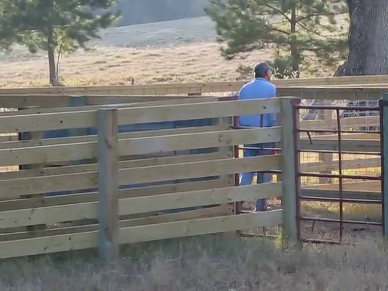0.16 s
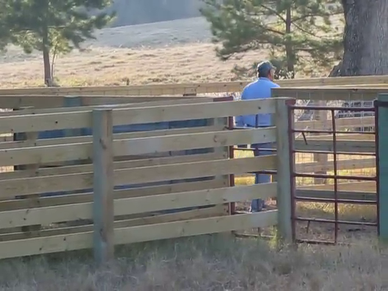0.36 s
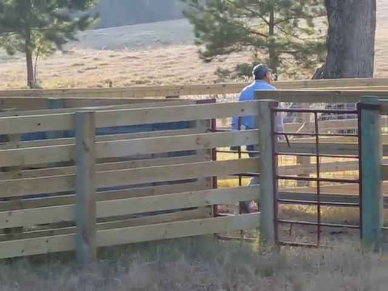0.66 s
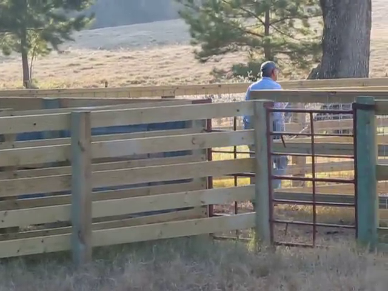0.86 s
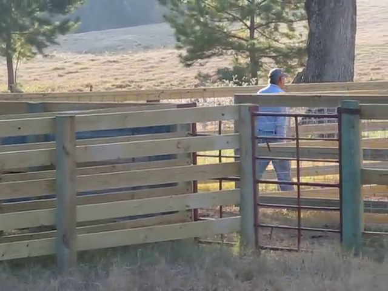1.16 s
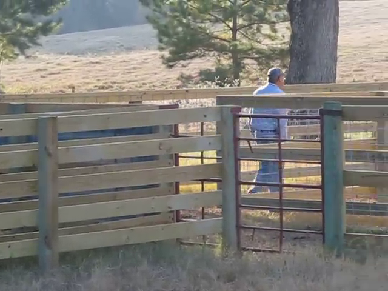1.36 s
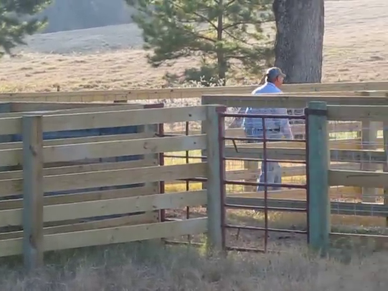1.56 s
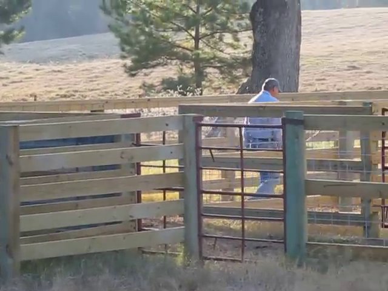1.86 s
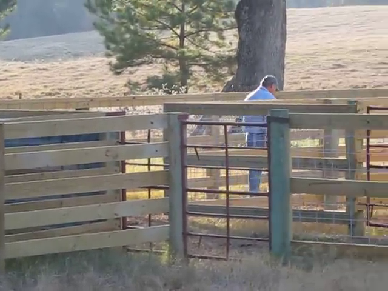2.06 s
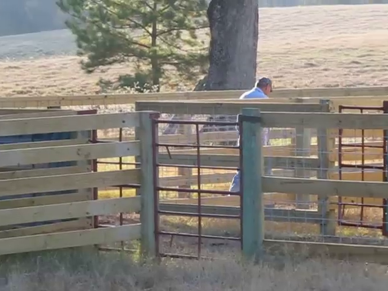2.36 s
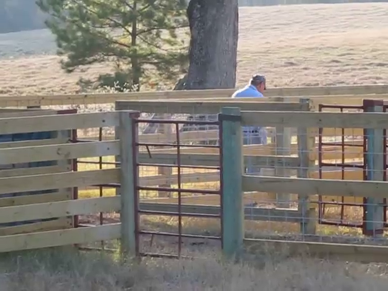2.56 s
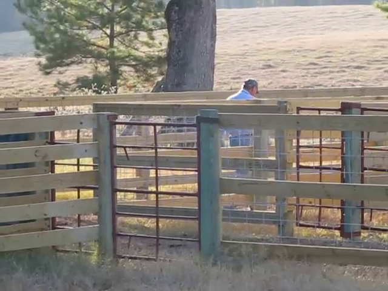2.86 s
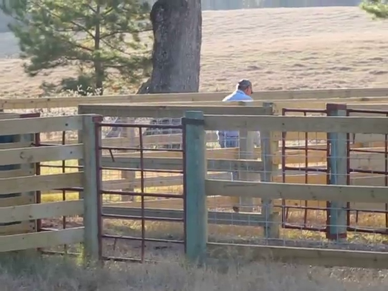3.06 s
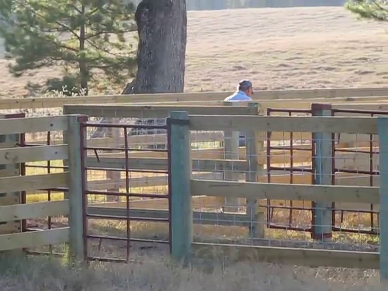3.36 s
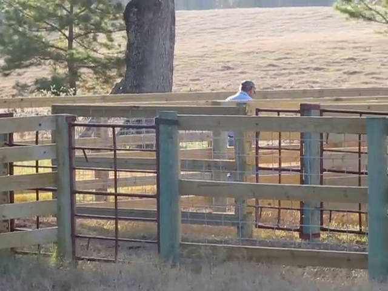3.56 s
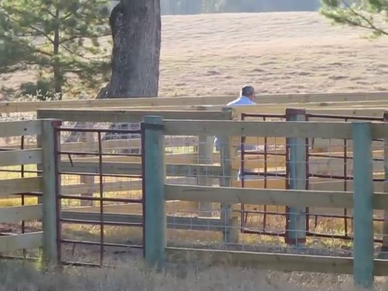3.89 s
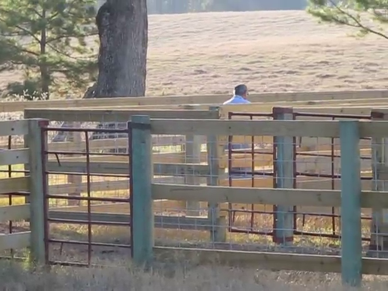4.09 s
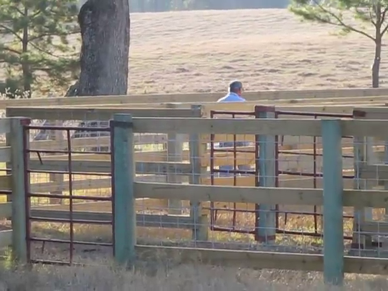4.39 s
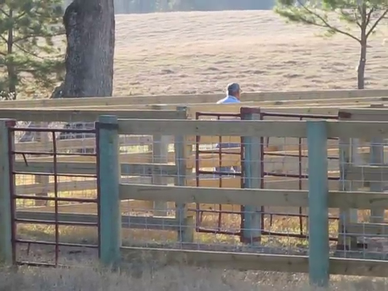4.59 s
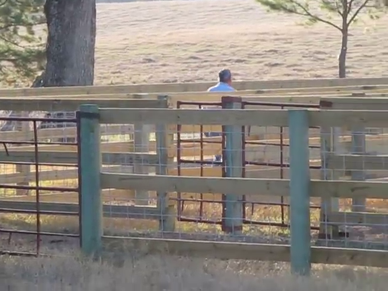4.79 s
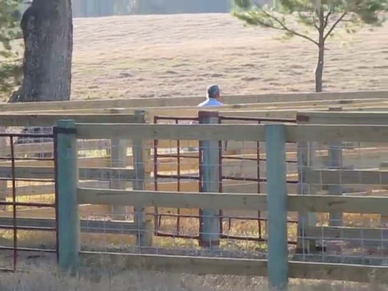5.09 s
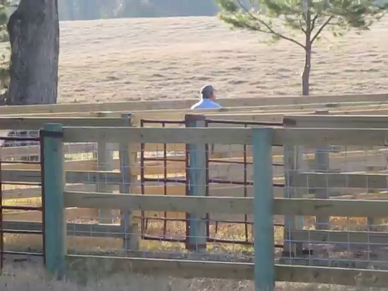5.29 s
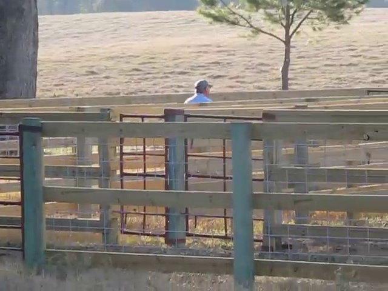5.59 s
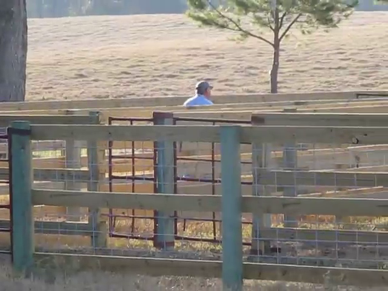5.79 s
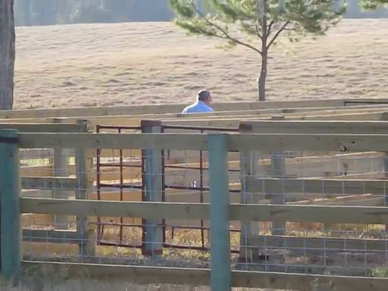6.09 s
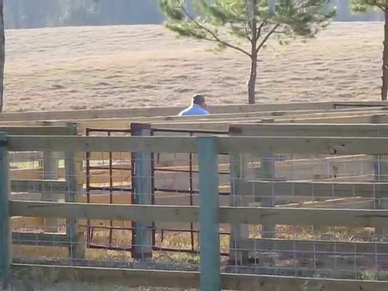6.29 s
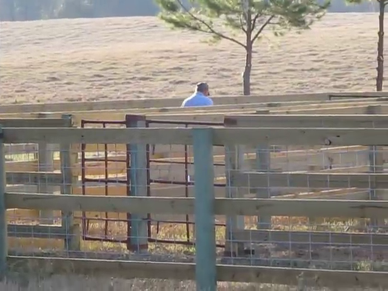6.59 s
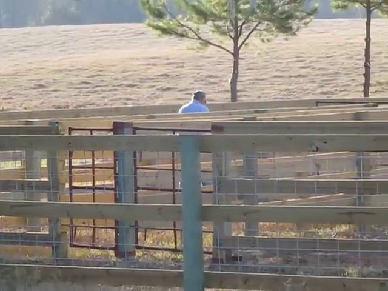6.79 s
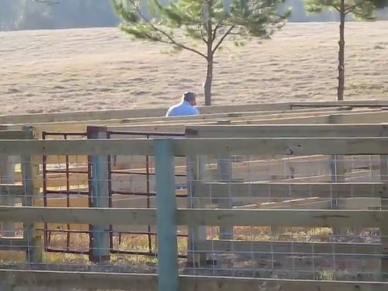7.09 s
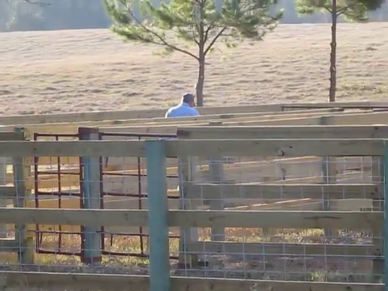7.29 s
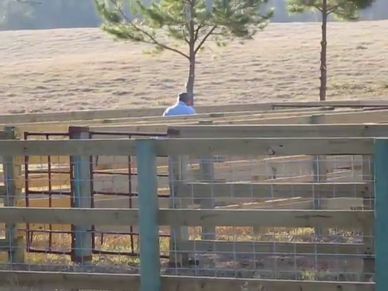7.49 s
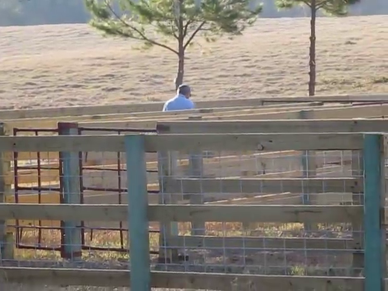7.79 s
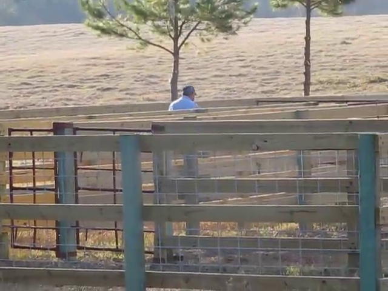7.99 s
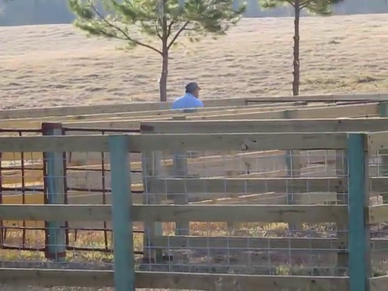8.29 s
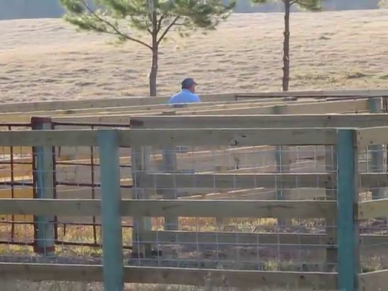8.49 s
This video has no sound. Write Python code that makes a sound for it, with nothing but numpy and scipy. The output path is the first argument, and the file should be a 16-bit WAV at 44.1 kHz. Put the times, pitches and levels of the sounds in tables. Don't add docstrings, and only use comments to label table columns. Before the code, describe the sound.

A single rising moo rings over an open field among faint birds and cricket trills, with camera lens ticks and late wind buffeting.

```python
import sys
import numpy as np
from scipy import signal
from scipy.io import wavfile
from scipy.ndimage import uniform_filter1d

SR = 44100
rng = np.random.default_rng(int(sys.argv[2]) if len(sys.argv) > 2 else 0)


def linear_from_db(decibels):
    return 10 ** (np.asarray(decibels, float) / 20)


def output_pcm(signal):
    pcm = np.clip(np.atleast_2d(signal).T, -1, 1) * 32767
    wavfile.write(sys.argv[1], SR, np.round(pcm).astype(np.int16))


N = 381448
T = np.arange(N) / SR


def rms_one(x):
    return x / np.sqrt(np.mean(x ** 2) + 1e-20)


def in_time(rows):
    s, *columns = np.transpose(rows)
    return [np.interp(T, s, c) for c in columns]


def window(rows, fade_s):
    return np.clip(np.minimum(T - rows[0][0], rows[-1][0] - T) / fade_s, 0, 1)


def at_hz(points, hz):
    table_hz, value = np.transpose(points)
    return np.interp(np.log(hz), np.log(table_hz), value)


def drift(rate_hz):
    r = np.exp(-40 * np.pi * rate_hz / SR)
    white = rng.standard_normal(N // 20 + 3002)
    slow = signal.lfilter([1], [1, -2 * r, r * r], white)[3000:]
    return np.interp(np.arange(N) / 20, np.arange(len(slow)), rms_one(slow))


def sine(hz):
    return np.sin(2 * np.pi * np.cumsum(hz) / SR)


def bump(x, center, half_width):
    return np.exp(-((x - center) / half_width) ** 2)


def band(x, low_hz, high_hz, order=2):
    return signal.sosfilt(signal.butter(order, [low_hz, high_hz], "band", fs=SR, output="sos"), x)


def lowpass(x, hz, order):
    return signal.sosfilt(signal.butter(order, hz, fs=SR, output="sos"), x)


def tract(x, modes):
    out = 0
    for k, (hz, width_hz, db) in enumerate(modes):
        r = np.exp(-np.pi * width_hz / SR)
        sos = [[(1 - r * r) / 2, 0, (r * r - 1) / 2, 1, -2 * r * np.cos(2 * np.pi * hz / SR), r * r]] * 2
        out = out + (-1) ** k * linear_from_db(db) * signal.sosfilt(sos, x)
    return out


def evened(x, gate, size=6000):
    return gate * x / np.sqrt(uniform_filter1d(x ** 2, size=size) + 1e-12)


def ports(x, pan_db, lag_samples):
    left = np.interp(np.arange(N) - lag_samples, np.arange(N), x)
    return np.array([left, x]) * linear_from_db([[pan_db / 2], [-pan_db / 2]])


# (time [s], pitch [Hz], fold tone [dB], breath [dB])
HUMMED = [
    (1.44, 69, -63, -64),
    (1.5, 79.98, -52, -68),
    (1.568, 93.6, -43, -55.5),
    (1.7, 141, -40, -58.5),
    (1.81, 176.3, -41.5, -58),
]
# (time [s], pitch [Hz], fold tone [dB], breath [dB])
BELLOW = [
    (1.9, 205, -60, -47),
    (1.969, 201.8, -45, -40.5),
    (2.261, 218.9, -54, -35.5),
    (2.42, 234.6, -40.5, -32.5),
    (2.585, 254.7, -37, -30.5),
    (2.731, 250.3, -34, -31.5),
    (2.889, 235.6, -39.5, -32.5),
    (3.01, 204.7, -39.5, -36.5),
    (3.1, 196.6, -53, -50),
]
# (frequency [Hz], width [Hz], lift [dB])
RINGING = [(700, 22, 7), (748, 16, 12), (850, 30, 8), (945, 30, 11), (1175, 25, 8), (1240, 20, 12)]
# (frequency [Hz], width [Hz], level [dB])
MOUTH = [(614, 126, -8.5), (730, 266, 0.5), (933, 130, -1.5), (1185, 264, 4), (1512, 116, -1),
         (1600, 30, 8), (1700, 390, -3), (2157, 820, -7.5), (2890, 400, -25), (3720, 905, -46),
         (5680, 349, -25.5)]
# (frequency [Hz], width [Hz], level [dB])
CHEST = [(205, 146, -7.5), (284, 109, 2), (329, 90, 6.5), (394, 117, -11), (456.3, 28, -5)]
# (time [s], frequency [Hz], level [dB])
FLAP = [(1.8, 346.7, -57), (1.86, 331, -42), (1.95, 280, -39), (2.3, 320.5, -40), (2.41, 290.4, -43.5),
        (2.5, 310, -43), (2.95, 318.2, -44), (3.025, 328.2, -31), (3.08, 310.8, -52)]
# (time [s], half length [s], rise [dB])
SWELLS = [(2.037, 0.009, 18.5), (2.104, 0.016, 11), (2.145, 0.014, 13), (2.297, 0.024, 11),
          (2.683, 0.014, 6), (2.991, .018, 6.5)]


def moo():
    pitch_hz, first_db, roar_db = in_time(HUMMED + BELLOW)
    gate = window(HUMMED + BELLOW, 0.017)
    mouth_opens_s, opening_s = 1.86, .08
    shut_db = -13 * np.clip((mouth_opens_s - T) / opening_s + 1, 0, 1)

    second_db = first_db - 24 + 20 * bump(2 * pitch_hz, 160, 55)
    cycles = np.cumsum(pitch_hz * (1 + 0.0036 * drift(22.5))) / SR
    first = linear_from_db(first_db + 0.61 * drift(40) + 2.4 * drift(6.7)) * np.sin(2 * np.pi * cycles)
    second = linear_from_db(second_db + 1.5 * drift(30)) * np.sin(4 * np.pi * cycles)

    flap_hz, flap_db = in_time(FLAP)
    flaps = np.cumsum(flap_hz * (1 + 0.017 * drift(23.8) + .04 * drift(4))) / SR
    beat = 1 + 0.27 * np.cos(2 * np.pi * (flaps - cycles))
    shaken = cycles + 0.014 * drift(40)

    open_db = 0.39 * first_db + 0.67 * roar_db + shut_db
    lines = 0
    for k, partial_db in enumerate([-10, -14, -11], 3):
        ring_db = sum(lift_db * bump(k * pitch_hz, hz, width_hz) for hz, width_hz, lift_db in RINGING)
        level = linear_from_db(open_db + partial_db + ring_db + 3.5 * drift(14.6))
        lines = lines + beat * level * np.sin(2 * np.pi * k * shaken)
    upper = 0
    for k in range(6, 14):
        upper = upper + beat * linear_from_db(-1.5 * k + 3.5 * drift(8)) * np.cos(2 * np.pi * k * shaken)

    breath = rng.standard_normal(N) * (1 + 0.19 * np.cos(2 * np.pi * cycles))
    roar = evened(tract(breath, MOUTH), gate) * linear_from_db(0.41 * drift(31))
    roar += linear_from_db(-4.0 + shut_db) * evened(tract(upper, MOUTH), gate)

    swell_db = sum(db * bump(T, s, half_s) for s, half_s, db in SWELLS)
    flap = linear_from_db(0.5 + swell_db + 0.83 * drift(38)) * np.sin(2 * np.pi * flaps)
    rasp = linear_from_db(0.5) * evened(tract(rng.standard_normal(N), CHEST), gate, size=1800)
    chest = np.sqrt(2) * gate * (first + second) + linear_from_db(flap_db) * window(FLAP, 0.011) * (flap + rasp)
    return chest, np.sqrt(2) * gate * lines + linear_from_db(roar_db - 2.0) * roar


def valley(x, t60_s):
    t = T[:SR]
    tail = rng.standard_normal((2, SR)) * linear_from_db(-60 * t / t60_s) * np.clip((t - .03) / 0.017, 0, 1)
    tail = band(tail, 360, 1600, order=1) / np.sqrt(SR * t60_s / 50)
    return signal.fftconvolve(tail, x[None], axes=1)[:, :N]


# (time [s], first tick [dB], second tick [dB])
TICKS = [(0.051, -42.5, -43), (0.148, -40.5, -46), (0.246, -44, -41.5), (0.347, -46, -37.5),
         (.447, -46.5, -46), (.55, -42.5, -48), (0.647, -44.5, -42), (0.745, -46, -38), (.846, -44, -44.5),
         (0.951, -41, -43), (1.048, -36, -48), (7.578, -42, -42), (7.682, -47, -41), (7.783, -46, -45),
         (7.881, -39.5, -46), (7.979, -45, -46), (8.078, -41, -47), (8.18, -43.5, -44), (8.28, -41, -43),
         (8.379, -46, -42), (8.479, -40.5, -46), (8.583, -46, -47)]
# (frequency [Hz], level [dB], t60 [s])
TICK_MODES = [(350, -9, .025), (650, -7, .02), (940, 0, .045), (1070, -2, .035), (1350, -5, .022),
              (1750, -6, .018), (2550, -6, .015), (3400, -12, .01)]


def struck(events, modes, offset_db, soft_s):
    out, t = np.zeros(N + 4000), T[:4000]
    luck = rng.standard_normal((len(events), len(modes), 3))
    for (s, db), draws in zip(events, luck):
        hit = 0
        for (hz, mode_db, t60_s), (strength, detune, phase) in zip(modes, draws):
            level = linear_from_db(mode_db + 2.5 * strength - 60 * t / t60_s)
            hit = hit + level * np.sin(2 * np.pi * hz * (1 + .03 * detune) * t + phase)
        hit = hit * (1 - np.exp(-t / soft_s))
        out[round(s * SR):][:4000] += linear_from_db(db + offset_db) * hit / np.abs(hit).max()
    return out[:N]


def lens_motor():
    gap_s = 0.028
    firsts = [(s, db) for s, db, _ in TICKS]
    seconds = [(s + gap_s, db) for s, _, db in TICKS]
    return struck(firsts + seconds, TICK_MODES, -1.0, soft_s=.001)


# (time [s], peak [dB], frequency [Hz])
KNOCKS = [(4.584, -46, 644), (6.958, -45, 426), (6.992, -47, 430), (7.009, -46, 947), (7.039, -44, 606),
          (7.046, -40.5, 890), (7.053, -53, 500), (7.058, -44, 590), (7.177, -51, 720), (8.436, -43, 415)]


def knocks():
    out = 0
    for s, db, hz in KNOCKS:
        modes = [(0.48 * hz, -5, .02), (hz, 0, .028), (0.97 * hz, -7, .018)]
        out = out + struck([(s, db)], modes, 1.0, soft_s=0.00037)
    return out


# (time [s], peak [dB])
SNAP = [(5.5096, -38.5)]
# (frequency [Hz], level [dB], t60 [s])
SNAP_MODES = [(8500, 0, .004), (10000, 0, .004), (11500, -1, .004), (13000, -3, .004), (14500, -7, .004)]


def snap():
    return struck(SNAP, SNAP_MODES, -4.5, soft_s=.00006)


# (start [s], level [dB])
FAR_BIRD = [
    (-.03, -58.5),
    (3.55, -54.5),
    (4.03, -53),
    (4.583, -54),
]
# (time after start [s], frequency [Hz], level [dB])
BIRD_NOTE = [(0, 1100, -1), (.03, 1325, -3), (.045, 1423, -1.5), (.122, 1153, -3), (.14, 1140, -1)]
# (time [s], held pitch [Hz], length [s], level [dB], start pitch / held pitch)
CHIRPS = [(0.52, 7400, .044, -61, 1.4), (2.635, 7910, 0.048, -56, 1.1), (4.593, 7030, 0.046, -55.5, 1.16),
          (7.322, 7400, .041, -51, 1.26), (5, 3100, .2, -68, 1.0)]
# (time [s], held pitch [Hz], length [s], level [dB], start pitch / held pitch)
PEEPS = [(0.793, 2040, .06, -67, .82), (1.49, 2400, .12, -62, 1.02), (1.568, 2740, .095, -68, 1.02),
         (1.47, 3100, .13, -70, 1.02), (1.527, 3700, .089, -68, 1.03), (8.152, 3000, .07, -66, 1.08)]


def birds():
    far, near = np.zeros(N), np.zeros(N)
    for start_s, level_db in FAR_BIRD:
        note = np.array(BIRD_NOTE) + [start_s, 0, level_db]
        hz, db = in_time(note)
        far += np.sqrt(2) * linear_from_db(db) * window(note, 0.0095) * sine(hz)
    for calls, hold, end in [(CHIRPS, .76, 1.06), (PEEPS, .4, .86)]:
        for s, held_hz, length_s, db, entry in calls:
            turns_s = s + length_s * np.array([0, 0.266, hold, 1])
            hz = held_hz * np.interp(T, turns_s, [entry, 1, 1, end])
            near += linear_from_db(db) * window([[s], [s + length_s]], 0.0036) * sine(hz)
    return far * linear_from_db(2.9 * drift(48)), near * linear_from_db(5.2 * drift(90))


# (start [s], end [s], level [dB])
CRICKET = [
    (-.017, .29, -59),
    (3.759, 4.264, -59),
    (7.267, 7.757, -58.5),
]


def cricket():
    strokes_per_s, stroke_share = 35.7, .72
    near = np.zeros(N)
    for start_s, end_s, db in CRICKET:
        stroke = ((T - start_s) * strokes_per_s) % 1
        hz = 3890 - 400 * stroke ** 2
        shape = np.sin(np.pi * np.clip(stroke / stroke_share, 0, 1)) * linear_from_db(db + 0.5 * drift(16))
        near += window([[start_s], [end_s]], 0.013) * shape * sine(hz)
    chorus = rms_one(tract(rng.standard_normal((2, N)), [(3866, 1030, 0)]))
    return ports(near, 15.0, 3.7) + linear_from_db(-61.5 + drift(1.0) - 4.5) * chorus


# (time [s], level [dB])
WIND = [(0, -49.5), (.7, -48), (.8, -52.5), (1.3, -54), (1.7, -54.5), (2.1, -56.5), (2.9, -55), (3.3, -52),
        (3.8, -51), (3.95, -51.5), (6.1, -54), (6.7, -51.5), (7.55, -52), (7.66, -45), (7.95, -34.5),
        (8.4, -36), (8.65, -35.5)]
# (time [s], half length [s], level [dB], left-right [dB])
BUFFETS = [(0.702, 0.018, -42, 1), (1.282, 0.016, -48.5, 2), (3.062, 0.046, -40.5, -1),
           (3.776, .025, -45, -5), (7.066, .03, -58, -19.5), (7.61, 0.013, -39.5, -14.5),
           (7.955, 0.015, -34.5, 3), (8.067, 0.02, -35, -2), (8.207, .03, -25.5, 8.5),
           (8.24, 0.033, -26.5, 5.5), (8.36, 0.052, -32, 16.5), (8.457, 0.012, -34, -8),
           (8.58, .03, -36, 6)]
# (low [Hz], high [Hz], growth, level [dB], evening span [s])
EDDIES = [
    (12, 38, .85, -8, .1),
    (34, 68, 1.2, 10, .06),
    (72, 130, 1.4, 6, .035),
]


def wind():
    sides = np.array([[.5], [-.5]])
    lump_db, sway_db = 1.5 * drift(1.9), 3 * drift(3.7)
    power = linear_from_db(in_time(WIND)[0] + lump_db + sway_db * sides) ** 2
    for s, half_s, db, pan_db in BUFFETS:
        power = power + linear_from_db(db + pan_db * sides) ** 2 * bump(T, s, half_s)
    gusts = 0
    for low_hz, high_hz, growth, db, span_s in EDDIES:
        level = power ** (growth / 2) * linear_from_db(db + 1.55 * drift(23))
        eddy = band(rng.standard_normal((2, N)), low_hz, high_hz)
        gusts = gusts + level * evened(eddy, 0.69, size=round(span_s * SR))
    gusts = .22 * np.tanh(gusts / .22)
    return lowpass(gusts, 170, order=3)


# (time [s], level [dB])
HUM = [(0, -88), (4.1, -71), (5.0, -63), (7.1, -59), (7.5, -84.5), (8.65, -76)]


def drone():
    level = linear_from_db(in_time(HUM)[0] - 3.5 + 2.4 * drift(3.9))
    return np.sqrt(2) * level * sine(122.5 + 1.78 * drift(2.85))


# (odd multiple of half the frame rate, level [dB])
WHINE = [(-3, -86), (-1, -74), (1, -74), (3, -85)]


def whine():
    whine_hz, frame_hz, phase_rad = 7867.13, 29.97, 0.16
    out = 0
    for m, db in WHINE:
        angle = 2 * np.pi * (whine_hz + m * frame_hz / 2) * T + m * phase_rad
        out = out + np.sqrt(2) * linear_from_db(db) * np.cos(angle)
    return out


# (frequency [Hz], level [dB per Hz])
AIR = [(35, -36), (60, -9), (123, -10.5), (152, -10.5), (292, -8), (320, -11.5), (629, -11), (1260, -11.5),
       (1450, -15), (2480, -17), (3860, -19.5), (7060, -21.5), (7940, -22.5), (15600, -32)]
# (frequency [Hz], correlation [-1..1])
LIKENESS = [(60, 1), (180, 0.8), (550, 0.34), (1650, 0.22), (4970, 0.045), (15000, 0.12)]


def air():
    out, edges_hz = 0, np.geomspace(70, 15900, 17)
    white = rng.standard_normal((2, 2, N))
    for k, (low_hz, high_hz) in enumerate(zip(edges_hz, edges_hz[1:])):
        mid, side = band(white[k % 2], low_hz, high_hz)
        hz = np.sqrt(low_hz * high_hz)
        alike = np.clip(at_hz(LIKENESS, hz), -1, 1)
        gain = linear_from_db(at_hz(AIR, hz) + 0.63 * drift(6))
        out = out + gain * (np.sqrt(1 + alike) * mid + np.sqrt(1 - alike) * side * [[1], [-1]])
    return linear_from_db(-54) * rms_one(out)


def scene():
    chest, mouth = moo()
    far, near = birds()
    low_mouth = lowpass(mouth, 950, order=2)
    field = ports(chest + low_mouth, 0.42, 0.49) + ports(mouth - low_mouth, -2.7, 2.44)
    field += linear_from_db(-15) * valley(chest, t60_s=1.2) + linear_from_db(-16) * valley(mouth, t60_s=2.1)
    field += far + linear_from_db(-4) * valley(far, t60_s=1.0)
    field += ports(near, 2.8, 1.86) + linear_from_db(7) * valley(near, t60_s=0.41)
    field += cricket() + drone()
    camera = lens_motor() + knocks() + snap() + whine()
    return field + camera + air() + wind()


def top_cut(x):
    return signal.sosfilt(signal.butter(12, 15730, fs=SR, output="sos"), x)


def record(dry):
    return top_cut(dry)


dry = scene()
out = record(dry)
output_pcm(out)
```